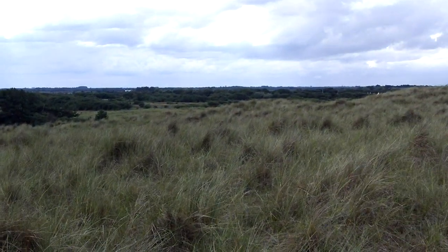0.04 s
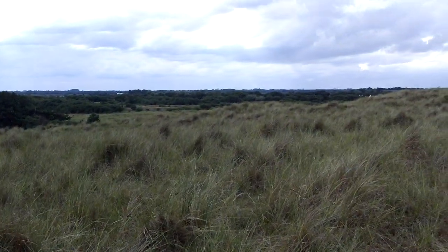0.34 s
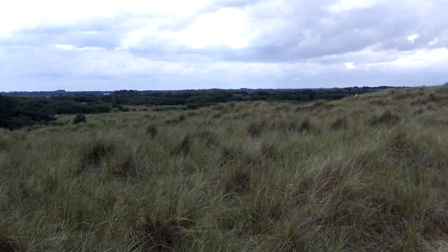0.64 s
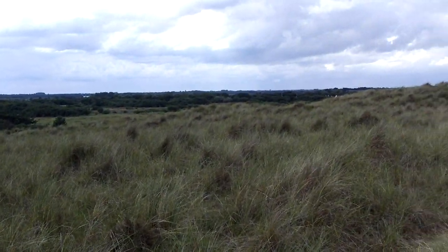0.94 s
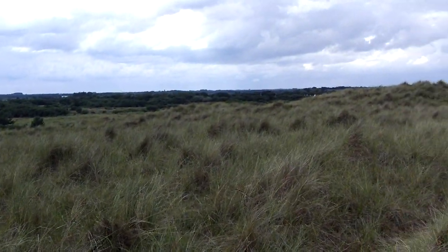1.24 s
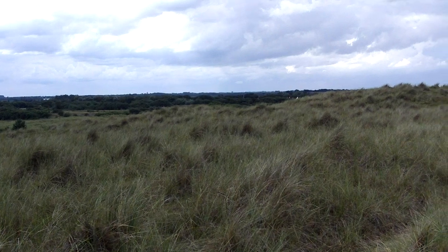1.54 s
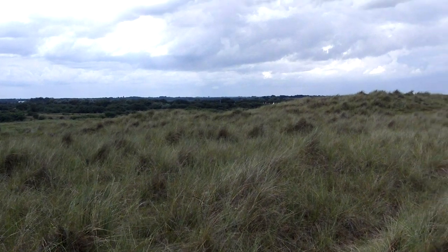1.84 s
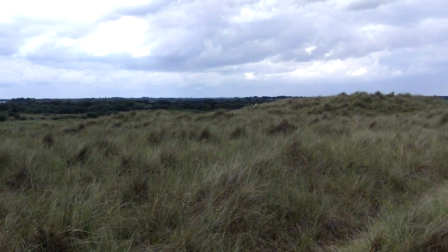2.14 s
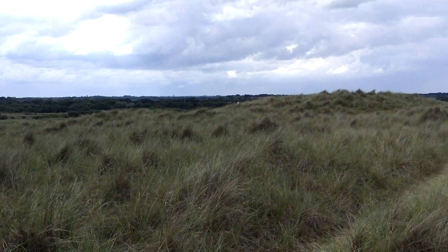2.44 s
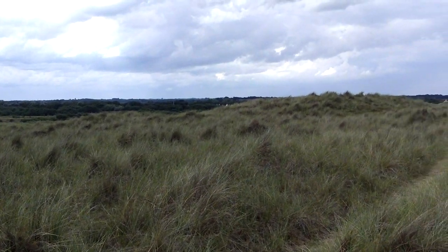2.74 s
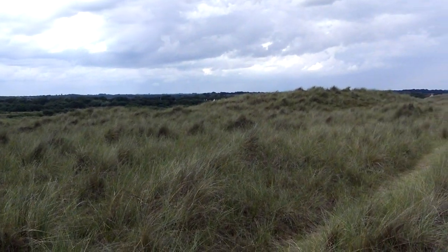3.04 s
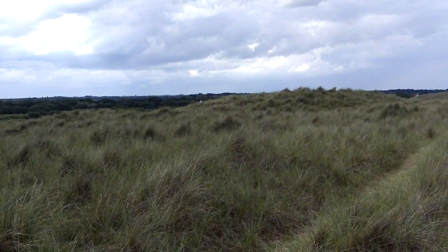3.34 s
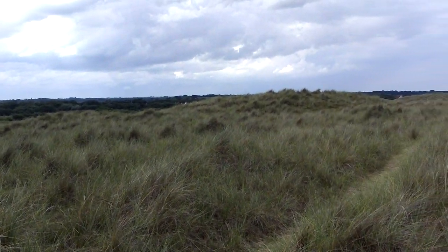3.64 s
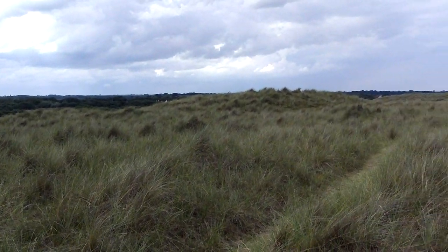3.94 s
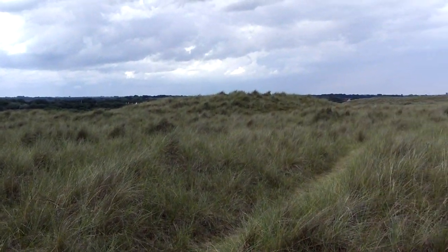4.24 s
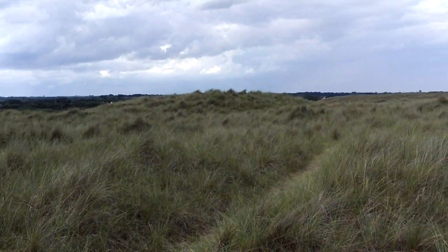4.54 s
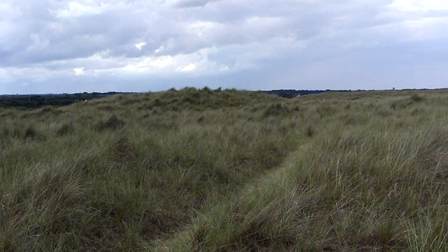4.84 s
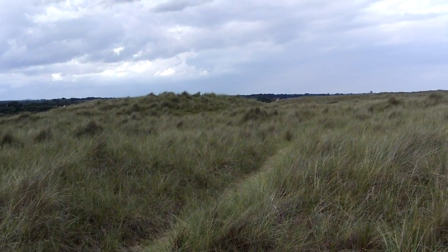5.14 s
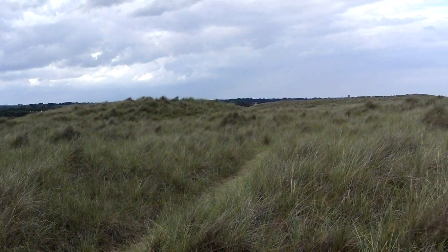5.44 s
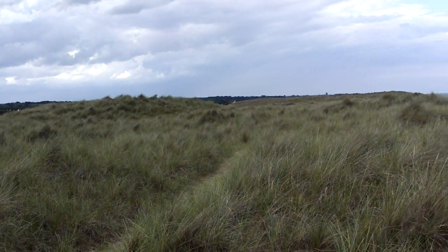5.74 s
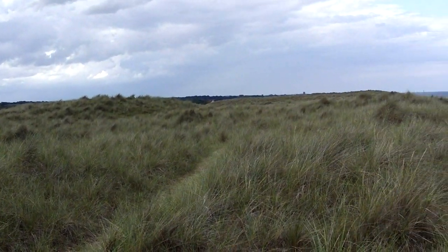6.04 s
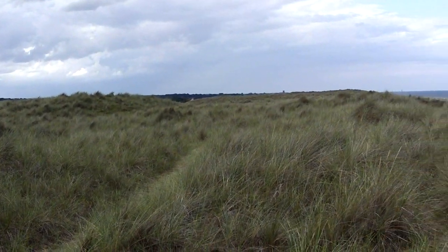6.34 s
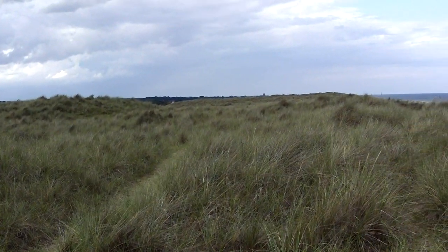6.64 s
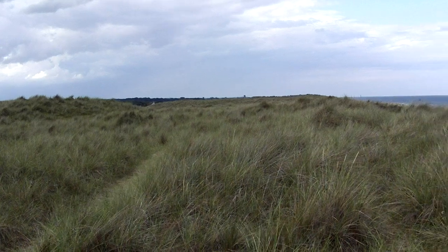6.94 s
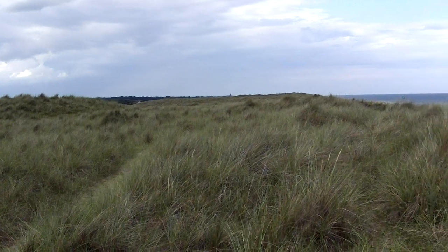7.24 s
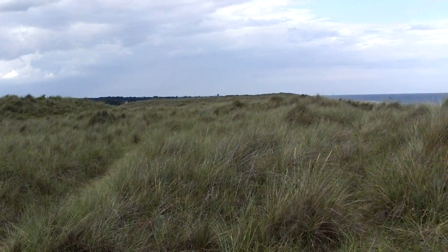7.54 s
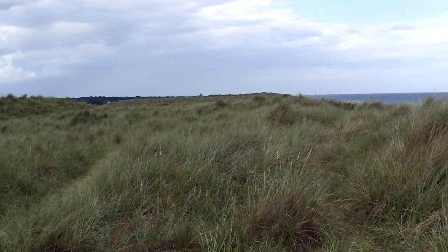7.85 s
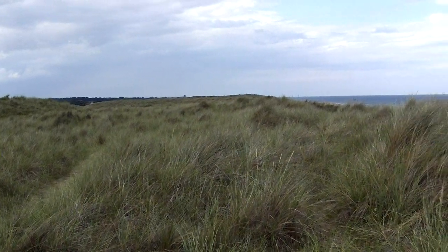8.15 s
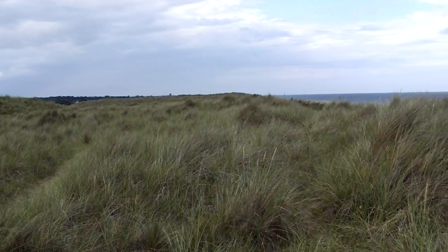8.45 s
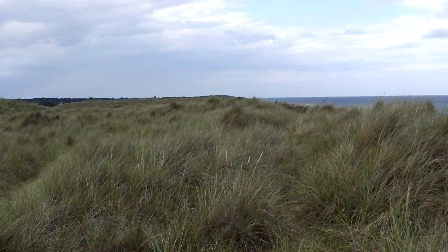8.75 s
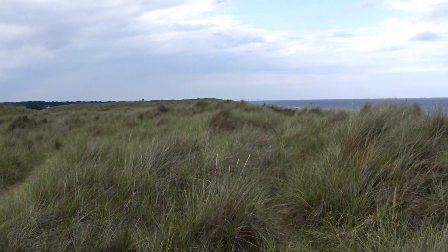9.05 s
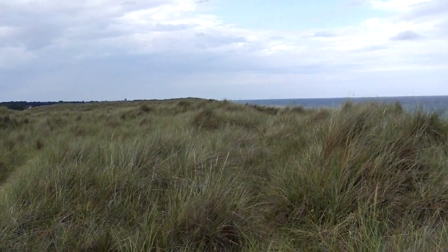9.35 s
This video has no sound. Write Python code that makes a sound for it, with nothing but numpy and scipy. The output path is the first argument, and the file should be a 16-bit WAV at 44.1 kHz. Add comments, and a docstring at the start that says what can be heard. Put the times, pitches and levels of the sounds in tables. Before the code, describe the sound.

A soft, steady rush of wind crosses coastal dunes for the whole nine and a half seconds, mixed with the hiss of swaying grass and the dull, gently swelling roar of distant surf. The nearest blades sizzle briefly around 1.5 seconds. From about 2.4 to 3 seconds, wind buffets the microphone with a lumpy low rumble and a cluster of small bumps, including one sharp pop at 2.7 seconds that is by far the loudest sound. The wind eases slightly between 4 and 5 seconds, then picks up again. The grass hisses more brightly in gusts around 5.6, 7.2 and 8.3 seconds. Lighter rumbles and soft pops hit the microphone at about 7.2 to 7.4 seconds and again near 9.3 seconds. A faint, thin electronic whine and hiss from the camera continue underneath throughout.

```python
"""A steady rush of wind and the hiss of dune grass, over the dull roar of distant surf.
The stems hiss as they sway, and the nearest blades rub into a sizzle that brightens with each gust.
Turbulence rumbles on the microphone port of a small camera and single eddies pop against it,
one far louder than the rest. The camera's electronics add a faint whine and hiss."""
import sys
import numpy as np
from scipy import signal
from scipy.fft import rfft, irfft, next_fast_len
from scipy.io import wavfile

SR = 44100
rng = np.random.default_rng(int(sys.argv[2]) if len(sys.argv) > 2 else 0)


def transcribe(signal):
    """Save signal, clipped to [-1, 1], as a 16-bit WAV file at the path in sys.argv[1]."""
    frames = np.atleast_2d(signal).T
    limited = np.clip(frames, -1, 1)
    pcm = np.round(limited * 32767).astype(np.int16)
    wavfile.write(sys.argv[1], SR, pcm)


N = 422478


def from_db(db):
    """Decibels to gain."""
    return 10 ** (np.asarray(db) / 20)


def rms_one(x):
    """Scale to an rms of 1."""
    return x / np.sqrt(np.mean(x ** 2) + 1e-20)


def envelope(points):
    """Straight ramps between (time, value) points, at every sample."""
    return np.interp(np.arange(N) / SR, *np.transpose(points))


def drift(rate_hz):
    """Smooth random wander of rms 1 that changes about rate_hz times a second."""
    hop, settle = 40, 2000
    pole = np.exp(-2 * np.pi * rate_hz * hop / SR)
    noise = rng.standard_normal(N // hop + settle + 2)
    slow = signal.lfilter([1], [1, -2 * pole, pole * pole], noise)[settle:]
    return np.interp(np.arange(N) / hop, np.arange(len(slow)), rms_one(slow))


def coloured_noise(colour, pitch=1):
    """Noise of rms 1 with the given spectrum, moved up in frequency by the factor pitch."""
    size = next_fast_len(N)
    hz = np.arange(size // 2 + 1) * SR / size
    colour_hz, colour_db = np.transpose(colour)
    gain = from_db(np.interp(np.log(hz / pitch + 1e-9), np.log(colour_hz), colour_db))
    return rms_one(irfft(rfft(rng.standard_normal(size)) * gain, size)[:N])


def surge_power(surges, rise_share):
    """Summed power of bell-shaped surges; each spends rise_share of its length building up."""
    t, power = np.arange(0, N + 40, 40) / SR, 0
    for crest_s, level_db, length_s in surges:
        from_crest = (t - crest_s) / (length_s * np.where(t < crest_s, rise_share, 1 - rise_share))
        power = power + from_db(level_db) ** 2 / (1 + from_crest ** 2 / 2) ** 3
    return np.interp(np.arange(N) / SR, t, power)


def camera(whine_db, shared_hiss_db, channel_hiss_db):
    """A thin electronic whine over amplifier hiss, part of the hiss separate in each channel."""
    # spectrum of the amplifier hiss: freq_hz, relative_db
    hiss_colour = [(3000, -23.5), (8000, -26), (10000, 0.5), (11500, -2), (12400, -2.5), (13000, 3),
                   (13800, -6), (14600, 2), (15000, -3)]
    # faint steady tones at the very top: pitch_hz, rms_db
    top_tones = [(14955, -91), (14985, -81), (15015, -88)]
    whine_hz, fields_per_s = 7867.1, 59.94
    t = np.arange(N) / SR
    polarity = np.sign(np.sin(np.pi * fields_per_s * t))  # flips with every picture field
    whine = from_db(whine_db) * polarity * np.sin(2 * np.pi * whine_hz * t)
    tones = sum(from_db(db) * np.sin(2 * np.pi * (hz * t + rng.random())) for hz, db in top_tones)
    channel_hiss = from_db(channel_hiss_db) * np.array([coloured_noise(hiss_colour) for _ in range(2)])
    shared_hiss = from_db(shared_hiss_db) * coloured_noise(hiss_colour)
    return np.sqrt(2) * (whine + tones) + shared_hiss + channel_hiss


def surf(level_db):
    """Far surf blurs into a dull, gently swelling roar."""
    # swell of the surf: time_s, relative_db
    swell = [(0, 0.5), (0.5, 2.5), (0.75, 0.5), (1.9, 1.2), (2.4, 0), (4.5, -1), (5.3, -0.1), (6.9, 0.2),
             (7.4, 1.1), (7.9, 0.2), (9.58, -1.3)]
    # spectrum of the roar: freq_hz, relative_db
    roar_colour = [(30, -38), (100, -27), (200, -20), (310, -12), (450, -7.5), (650, -2), (830, 0),
                   (1050, -2.5), (1500, -21.5), (4000, -37)]
    return from_db(level_db + envelope(swell)) * coloured_noise(roar_colour)


def wind(level_db, wander_db):
    """Wind surges over the dunes in a broad midrange rush."""
    # strength of the wind over the dunes: time_s, relative_db
    strength = [(0, 0.6), (0.15, -0.5), (0.42, 1.1), (0.7, 0.0), (0.9, 2.9), (1.15, -0.4), (1.5, 1.2),
                (2.4, -0.8), (3.8, -0.9), (4.05, -2.5), (4.7, -2.5), (5.55, -0.2), (6.15, 1.2),
                (6.35, -1.2), (6.6, 1.3), (7.2, 1.4), (8.3, 0.5), (9.58, 0.2)]
    # spectrum of the rush: freq_hz, relative_db
    rush_colour = [(300, -31.5), (600, -15), (900, -5), (1250, 1), (1600, -1.3), (2000, -5.5),
                   (3200, -14.5), (6000, -30.5), (12000, -42)]
    return from_db(level_db + envelope(strength) + wander_db * drift(7.4)) * coloured_noise(rush_colour)


def grass(stem_db, blade_db, sway_db, flutter_db):
    """Countless stems hiss as they sway; the nearest blades rub together in a fine, fluttering sizzle."""
    # strength of the wind down in the grass: time_s, relative_db
    strength = [(0, -2.1), (0.65, -1.1), (1.72, 0.2), (2.35, -0.6), (2.85, -3), (3.05, -1.5), (3.25, -2.7),
                (3.52, -0.2), (4.25, -1.2), (4.6, -3.5), (5.03, 0.4), (5.28, -1.2), (5.55, 2.1), (6.4, 1.4),
                (7.2, 2.5), (7.8, 2.3), (8.4, 3.5), (9.3, 0)]
    # gusts that sweep the nearest tussocks: crest_s, sizzle_db, length_s
    gusts = [(1.39, -63, .08), (1.58, -67, .4), (5.6, -63.5, .35), (7.23, -60.5, .3), (8.3, -67.5, 0.76)]
    # spectrum of the stems' hiss: freq_hz, relative_db
    stem_colour = [(800, -24.5), (1500, -2), (2200, 1), (2800, 1), (4000, -2), (5500, -4.5), (7300, -8.5),
                   (9500, -26), (14000, -49)]
    # spectrum of the blades' sizzle: freq_hz, relative_db
    blade_colour = [(3000, -20.5), (6000, -5), (8000, 3.5), (9200, 3), (10500, -3.5), (12000, -8.5),
                    (14500, -11.5)]
    stem_follow, blade_follow = 1.18, .6  # dB of sound per dB of wind
    wind_db = envelope(strength)
    swing_db = sway_db * drift(9.6)
    stems = from_db(stem_db + stem_follow * wind_db + swing_db) * coloured_noise(stem_colour)
    bed_power = from_db(blade_db + blade_follow * wind_db) ** 2
    gust_power = surge_power(gusts, rise_share=.25)  # builds quickly, dies slowly
    flutter = from_db(swing_db + flutter_db * drift(25))
    blades = np.sqrt(bed_power + gust_power) * flutter * coloured_noise(blade_colour)
    return stems + blades


def buffeting(calm_db, calm_swing_db, lump_db, crossfade_db, fast_pitch):
    """Turbulent pressure on the microphone port: a lumpy rumble, higher in pitch when the flow is fast."""
    # puffs of turbulence on the port: crest_s, level_db, length_s
    puffs = [(.1, -66.5, .16), (.56, -67, 0.14), (1.04, -61.5, .08), (1.22, -63, 0.19), (1.65, -68, 0.11),
             (2.45, -53.5, 0.25), (2.71, -48.5, 0.23), (2.88, -51, 0.13), (3.33, -63.5, .18),
             (3.72, -64, 0.27), (5.0, -61, 0.062), (5.18, -61, .08), (5.52, -62.5, 0.26),
             (6.03, -59.5, 0.066), (6.85, -67, .1), (7.19, -56.5, .05), (7.4, -53, 0.17),
             (7.82, -63, 0.064), (9.29, -53.5, 0.14)]
    # spectrum of the rumble in slow flow: freq_hz, relative_db
    rumble_colour = [(15, -18), (35, -10), (70, -0.5), (120, -0.5), (190, 0), (280, -3), (420, -12),
                     (650, -24.5), (1400, -46)]
    calm_power = from_db(calm_db + calm_swing_db * drift(4.6)) ** 2  # light turbulence between puffs
    power = calm_power + surge_power(puffs, rise_share=0.54)
    fast_share = power / (power + from_db(crossfade_db) ** 2)
    slow_rumble = np.sqrt(1 - fast_share) * coloured_noise(rumble_colour)
    fast_rumble = np.sqrt(fast_share) * coloured_noise(rumble_colour, pitch=fast_pitch)
    lumps = from_db(lump_db * drift(24))
    return np.sqrt(power) * lumps * (slow_rumble + fast_rumble)


def eddies(collapse_cycles, growth):
    """An eddy rocks the air in the port: the swing grows for a cycle or two, then collapses as it sheds."""
    # single eddies that pop against the port: peak_s, peak_db, pitch_hz
    hits = [(2.626, -36, 315), (2.712, -32, 230), (2.7256, -7.5, 613), (2.737, -25.5, 480),
            (2.751, -33, 330), (2.766, -36, 350), (2.816, -38.5, 149), (2.889, -35.5, 378),
            (3.04, -45, 260), (4.99, -52, 170), (5.477, -47, 190), (7.181, -50, 150), (7.283, -35, 170),
            (7.37, -36, 350), (7.429, -37, 330), (9.309, -34, 252)]
    t, pops = np.arange(N) / SR, np.zeros(N)
    for peak_s, peak_db, pitch_hz in hits:
        near = np.abs(t - peak_s) * pitch_hz < 10
        cycles = (t[near] - peak_s) * pitch_hz
        age = cycles / collapse_cycles
        swing = np.exp(growth * (1 + age - np.exp(age)))
        pops[near] += from_db(peak_db) * swing * np.cos(2 * np.pi * cycles)
    return pops


def vent(pressure, leak_hz):
    """The vent behind the diaphragm lets the slowest pressure changes leak away."""
    return signal.sosfilt(signal.butter(1, leak_hz, "high", fs=SR, output="sos"), pressure)


def scene():
    """The dunes and the wind on the port sit dead centre; the camera adds its own noise."""
    bed = surf(level_db=-53) + wind(level_db=-50.5, wander_db=0.53)
    rustle = grass(stem_db=-53, blade_db=-65, sway_db=0.55, flutter_db=0.65)
    rumble = buffeting(calm_db=-77.5, calm_swing_db=3, lump_db=3.0, crossfade_db=-55, fast_pitch=1.9)
    pops = eddies(collapse_cycles=0.22, growth=0.28)
    electronics = camera(whine_db=-64, shared_hiss_db=-76, channel_hiss_db=-75)
    return bed + rustle + vent(rumble + pops, leak_hz=35) + electronics


def record(dry):
    """A steep low-pass shaves off the highest treble."""
    cutoff_hz = 15150
    return signal.sosfilt(signal.ellip(14, .1, 80, cutoff_hz, fs=SR, output="sos"), dry)


dry = scene()
out = record(dry)
transcribe(out)
```